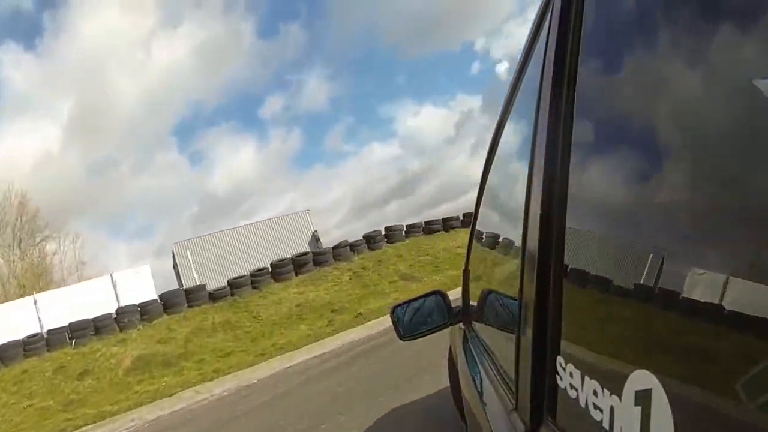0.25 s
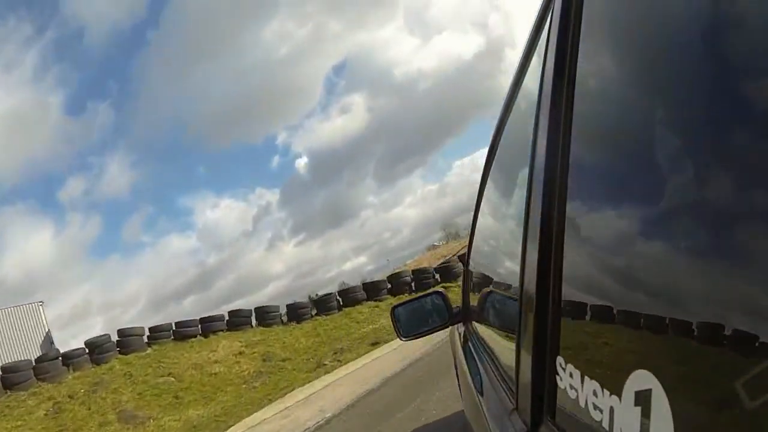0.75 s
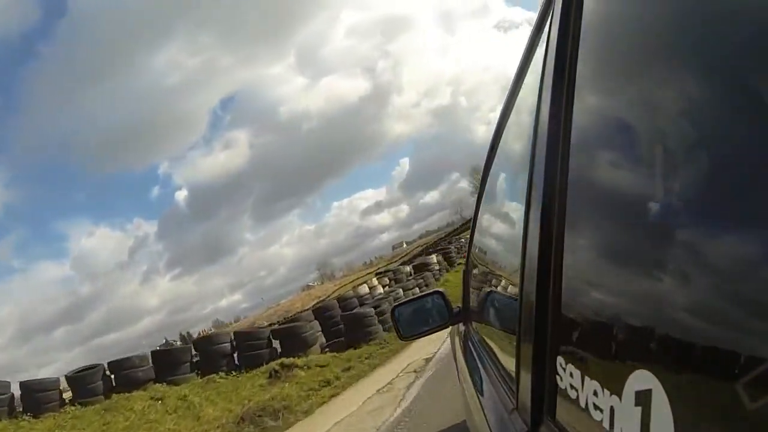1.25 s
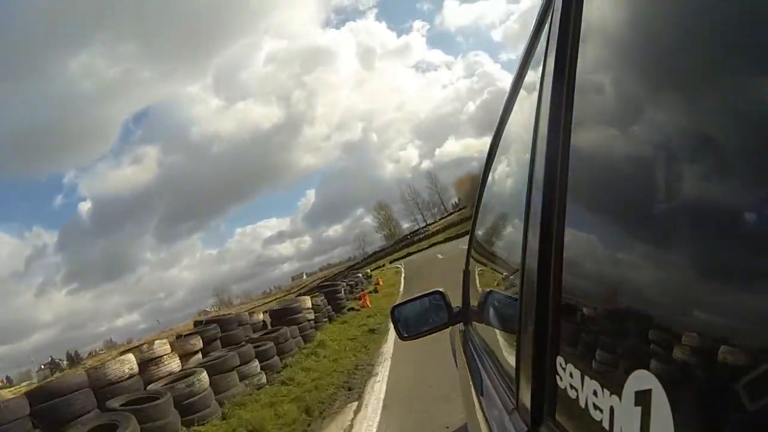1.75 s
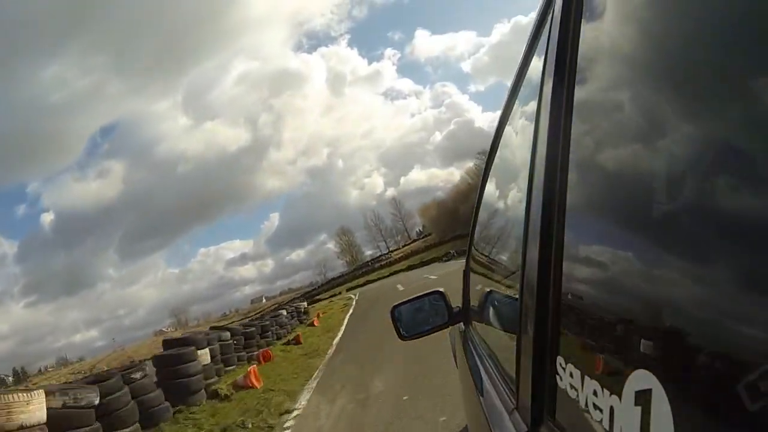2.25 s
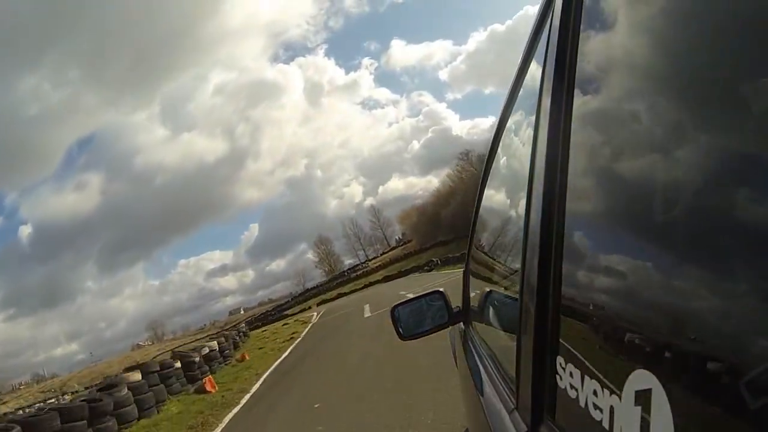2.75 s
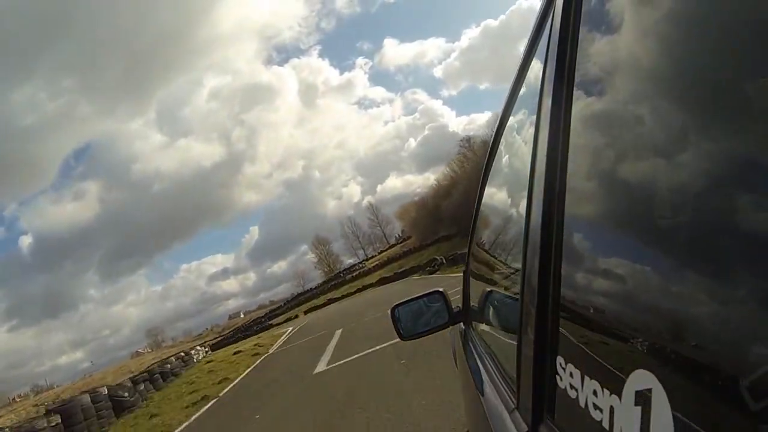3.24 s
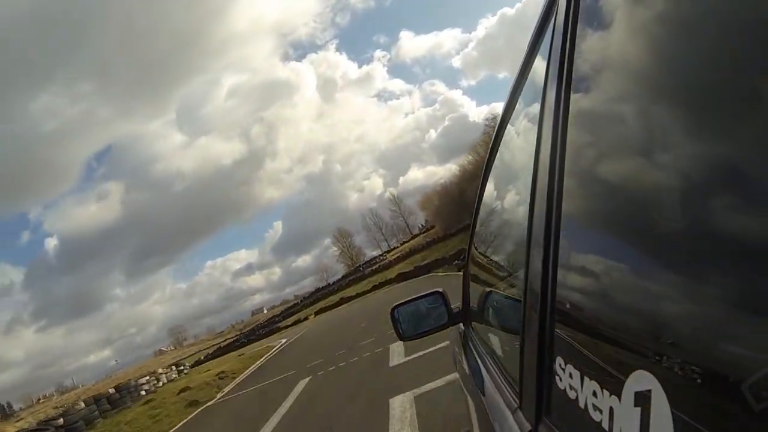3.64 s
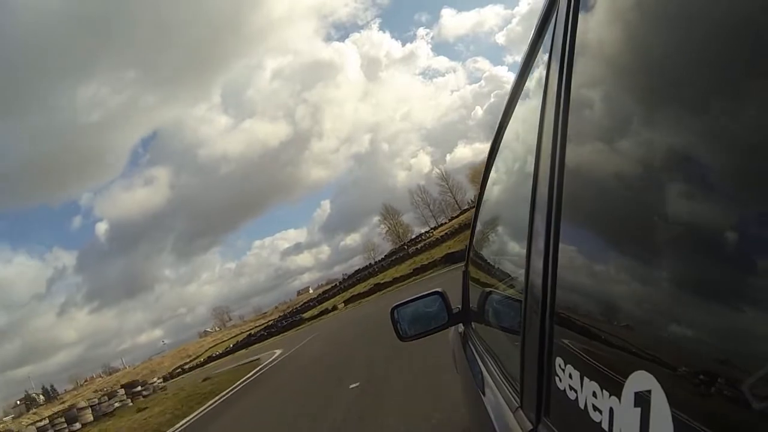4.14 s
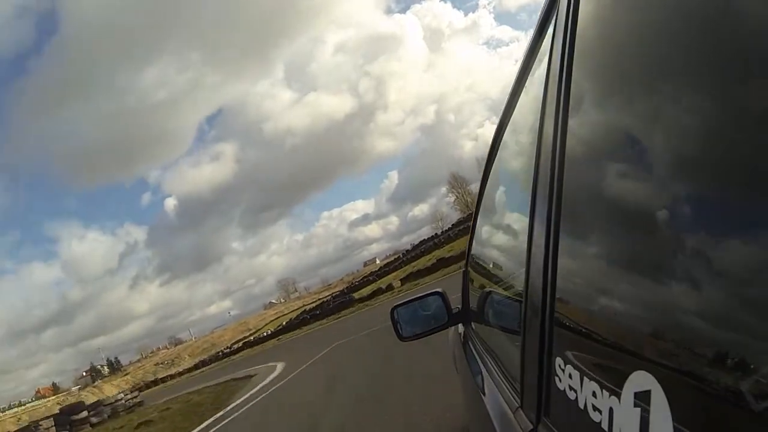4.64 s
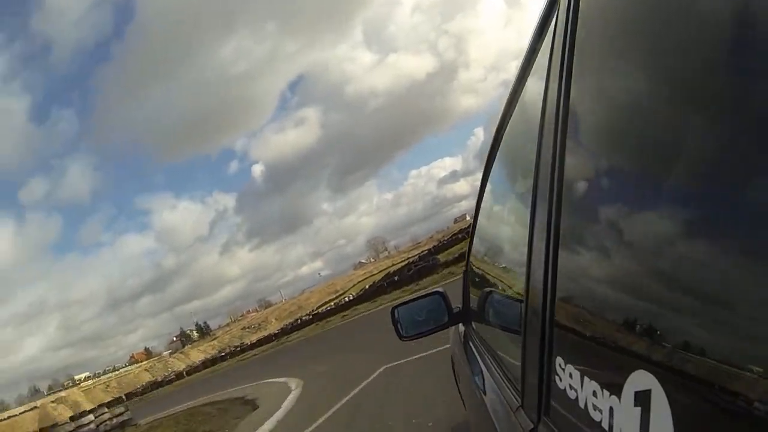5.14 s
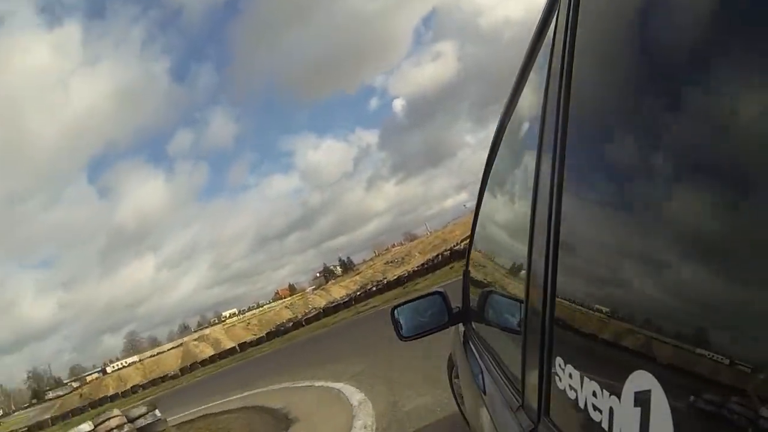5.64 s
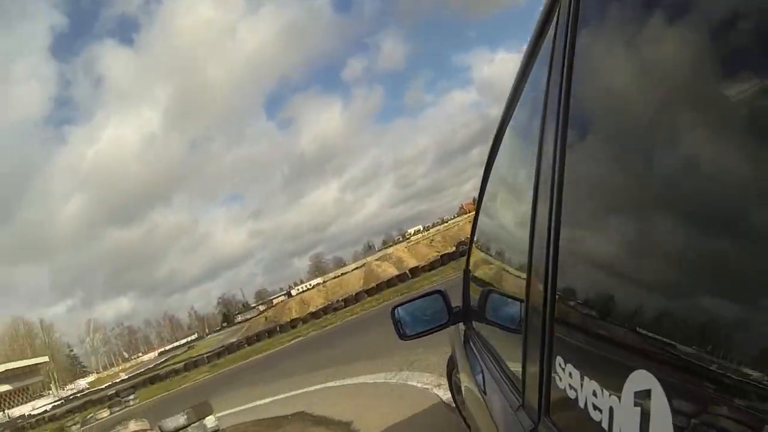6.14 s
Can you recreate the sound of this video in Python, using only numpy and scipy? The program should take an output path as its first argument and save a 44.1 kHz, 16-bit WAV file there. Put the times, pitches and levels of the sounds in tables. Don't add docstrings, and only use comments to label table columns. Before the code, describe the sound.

Outside a car on a tarmac track, a small enclosed microphone on the bodywork picks up a booming six-cylinder engine. Tyres squeal faintly leaving a bend, the engine climbs steadily with a gear whine and rushing hiss, then the driver lifts. A heavy bump and loud knock follow, and the lower engine note sinks while tyres scrub under braking.

```python
import sys
import numpy as np
from scipy import signal
from scipy.fft import rfft, irfft
from scipy.io import wavfile
from scipy.ndimage import uniform_filter1d

SR = 44100
rng = np.random.default_rng(int(sys.argv[2]) if len(sys.argv) > 2 else 0)


def volts(x):
    e = np.asarray(x, float) / 20
    return 10 ** e


def waveform_to_disk(signal):
    frames = np.transpose(np.atleast_2d(signal))
    scaled = np.clip(frames, -1, 1) * 32767
    samples = np.round(scaled).astype(np.int16)
    wavfile.write(sys.argv[1], SR, samples)


N = 281799
TIME = np.arange(N) / SR

# time_s, firing_hz
PULL_HZ = [(0, 74), (.6, 75.6), (.9, 78.4), (1.05, 81.2), (1.2, 85.8), (1.75, 97.6), (2.55, 113.9),
           (3.05, 124.7), (3.45, 132.6), (3.75, 137)]
# time_s, level_db
PULL_LOAD = [(0, -3), (.2, -2), (0.4, -6.5), (0.64, -1), (.8, -6.5), (1.2, 0), (2.45, 0), (2.55, -3.5),
             (2.95, -5.5), (3.4, -6.5), (3.6, -3.5), (3.75, -11)]
# time_s, firing_hz
SLOW_HZ = [(4.35, 108), (4.65, 104), (4.95, 95.3), (5.25, 91.4), (5.55, 84.8), (6, 77.5), (6.39, 73.5)]
# time_s, level_db
SLOW_LOAD = [(4.35, -30), (4.6, -13), (4.72, -20), (4.9, -9), (5.33, -5.5), (5.5, -0.5), (5.8, -10.5),
             (6.1, -10), (6.2, -16), (6.39, -5)]
# multiple, level_db
ORDERS = [(1, 0), (2, 0), (3, -3), (4, -12.5), (5, -7.5), (6, -8.5), (7.2, 1)]
# pitch_hz, width_hz, level_db
BODY = [(78.8, 7.6, -12.5), (80.9, 13.9, -6), (103.1, 23.6, -11), (127.2, 5.3, -15.5), (173.3, 20, -34),
        (191, 13, -31.5), (207, 28, -28.5), (232.9, 9.1, -34), (241.3, 6.8, -30), (275, 40, -40),
        (333, 17, -42), (347, 20, -36.5), (373, 17, -37.5), (464, 57, -35.5), (710, 97, -41),
        (895, 28, -36)]
# time_s, length_s, level_db
LIFTS = [
    (2.53, 0.022, -12.5),
    (2.972, 0.025, -5),
]
# time_s, level_db
MESH_SWELL = [(0, -8), (1.7, -6), (1.85, 0), (2.05, 3), (2.2, -1), (2.45, -1), (2.62, -6), (2.77, 8),
              (2.9, 3), (3.05, 6), (3.2, 8), (3.45, 6), (3.6, -6)]
# time_s, level_db
SECOND_MESH = [(1.9, -15), (2.15, -2), (2.3, 0), (2.45, 4), (2.6, 2.5), (2.78, 10), (2.95, -10), (3.1, -33)]
# time_s, level_db
WHEELSPIN = [(2.95, -40), (3.1, -7), (3.25, 4.5), (3.4, -3), (3.55, -16), (3.7, -35)]

# time_s, length_s, level_db
WOBBLES = [(.04, 0.12, -8), (.46, 0.13, -12.5), (1.65, 0.056, -9.5), (2.1, 0.047, -15.5),
           (2.37, 0.085, -15.5), (2.7, 0.1, -15), (3.08, 0.068, -13.5), (3.31, 0.16, -13),
           (3.5, 0.051, -18), (3.62, 0.2, -16), (3.83, 0.061, -6.5), (4, 0.062, -9), (4.16, 0.082, -14.5),
           (4.56, 0.071, -14), (4.84, 0.06, -11), (5.06, 0.11, -12.5), (5.3, 0.09, -7), (5.47, 0.12, -13.5),
           (5.67, 0.061, -8.5), (5.94, 0.065, -15.5), (6.19, 0.13, -8.5), (6.34, 0.077, -7)]
# time_s, length_s, level_db
BUFFETS = [(.05, 0.08, -31), (1.75, 0.12, -22.5), (2.3, 0.1, -25.5), (2.75, 0.39, -22.5),
           (3.28, 0.18, -21.5), (3.5, 0.022, -13.5), (3.62, 0.026, -27), (3.85, 0.19, -17),
           (4.03, 0.028, -15.5), (4.24, 0.075, -22), (4.97, 0.033, -29), (5.13, 0.057, -14),
           (5.41, 0.052, -18.5), (5.73, 0.019, -18), (5.96, 0.066, -12), (6.24, 0.05, -16.5)]
# pitch_hz, level_db (per Hz)
BUFFET_COLOUR = [(15, -2), (48, -1), (65, 5), (90, -6.5), (128, -14), (143, -17), (200, -28.5),
                 (300, -46.5), (900, -120)]
# time_s, length_s, level_db
BOOMS = [(0, 0.04, -16), (.17, 0.13, -24.5), (.33, 0.061, -15.5), (.45, 0.044, -22), (1.48, 0.12, -20.5),
         (1.65, 0.055, -24), (2, 0.21, -29), (2.5, 0.21, -29.5), (3.06, 0.26, -20.5), (3.35, 0.15, -20),
         (3.69, 0.099, -16), (3.88, 0.15, -19.5), (4.31, 0.035, -24.5), (4.5, 0.059, -23),
         (4.64, 0.08, -19.5), (4.86, 0.056, -18), (5.05, 0.12, -22.5), (5.3, 0.11, -18), (5.52, 0.094, -22),
         (5.8, 0.031, -20), (5.94, 0.1, -22.5), (6.06, 0.032, -26), (6.22, 0.17, -23)]
# time_s, pitch_hz
DOOR_HZ = [(0, 106), (3.7, 101.1), (4.4, 108.4), (6.39, 115.2)]

# time_s, level_db
AIRFLOW = [(0, -51.5), (.3, -53.5), (.52, -54.5), (.78, -59), (.95, -57.5), (1.53, -53.5), (1.6, -50.5),
           (2.05, -43.5), (2.46, -43), (2.54, -49), (2.8, -48), (2.95, -43), (3.2, -42), (3.42, -45),
           (3.56, -49.5), (3.8, -52), (3.83, -51.5), (4.6, -55), (5.2, -51.5), (5.8, -52), (6.39, -54.5)]
# time_s, length_s, level_db
GUSTS = [(.307, 0.011, -57), (.84, 0.06, -54), (.96, 0.073, -52.5), (1.1, 0.02, -54), (1.25, 0.21, -52),
         (1.58, 0.025, -50), (1.65, 0.069, -47.5), (2.03, 0.024, -50.5), (2.508, 0.025, -44),
         (2.564, 0.014, -44.5), (2.603, .014, -44), (2.674, 0.02, -46), (2.729, 0.01, -46),
         (2.79, 0.017, -48.5), (2.83, .015, -53), (3.11, 0.0093, -53.5), (3.29, 0.089, -38),
         (3.36, 0.012, -50), (3.825, 0.012, -48), (3.85, 0.03, -55), (3.9, 0.077, -47.5),
         (3.99, 0.034, -43), (4.4, 0.17, -52), (4.45, .05, -53.5), (5.29, 0.055, -50.5), (5.4, 0.087, -51),
         (5.8, 0.043, -57.5), (6, 0.32, -49.5)]
# pitch_hz, level_db (per Hz)
HISS_SLOPE = [(500, 0), (1000, 8.5), (1200, -3), (2000, 0.5), (2500, -5), (3300, -8), (4200, -15.5),
              (6000, -19), (8500, -30), (11000, -43), (13000, -55), (15000, -59)]
# pitch_hz, width_hz, level_db
CAVITIES = [(1408.5, 230, 17), (1600, 187, 12.5), (2865, 160, 9.5), (3610, 33, 7), (4936, 680, 12),
            (6540, 230, 4.5), (7570, 350, 8), (9870, 1600, 10)]
# time_s, level_db
GAP = [(0, 3), (3.5, 0.5), (3.56, -5), (3.8, -5), (3.82, -2), (4.1, 4.5), (4.5, 0.5), (4.6, -1.5),
       (5.15, -2), (5.3, 2), (5.5, -5.5), (5.7, -7), (5.73, 1.5), (6.1, 1.5), (6.25, -2.5), (6.39, -1.5)]
# time_s, level_db
ROAD = [(0, -40.5), (.6, -41), (1.2, -37), (2.2, -34), (3.3, -31.5), (3.75, -31), (4.5, -38), (5.3, -36),
        (5.8, -40), (6.39, -44)]
# time_s, length_s, level_db
PATCHES = [(0, 0.028, -28), (.1, .02, -47), (.26, 0.023, -41), (.307, 0.0081, -25), (.39, 0.043, -40),
           (.96, 0.14, -40), (1.52, 0.074, -37.5), (2.33, 0.034, -45), (2.48, 0.056, -33),
           (2.77, 0.033, -49), (2.94, 0.013, -31), (3, .03, -40), (3.11, 0.027, -42), (6.25, 0.039, -36.5)]
# pitch_hz, level_db (per Hz)
DRONE_COLOUR = [(90, -14), (150, 1), (210, -3.5), (280, -9.5), (400, -5.5), (550, -12), (800, -12.5),
                (1200, -16.5), (1700, -62.5), (4000, -110)]
# pitch_hz, width_hz, level_db
PANELS = [(337.3, 36, -11.5), (407.6, 6.4, -10.5), (512.3, 61, -13), (647, 30, -15), (729.5, 28, -16)]

# pitch_hz, level_db
WHINE = [(14745, -85.5), (14804, -93.5)]
# time_s, level_db
FAINT_HISS = [(0, -95.5), (.36, -93.5), (.4, -83), (1.4, -82.5), (1.5, -87), (2.2, -80.5), (3.4, -82),
              (3.7, -85.5), (4.9, -87.5), (5.3, -84), (5.7, -88), (6.39, -84)]

# time_s, length_s, pitch_hz, level_db
SLIP_LOW = [(.015, 0.019, 748, -36.5), (.05, 0.015, 722, -36), (.09, 0.015, 820, -39),
            (.13, .05, 800, -35.5), (.17, 0.012, 858, -40), (.2, 0.058, 840, -37.5), (.25, 0.015, 860, -32),
            (.325, 0.027, 852, -42), (.36, 0.0032, 835, -31), (.39, 0.02, 870, -43), (.44, 0.021, 825, -42),
            (.47, 0.036, 886, -37.5), (.52, 0.027, 846, -46)]
# time_s, length_s, pitch_hz, level_db
SLIP_HIGH = [(.03, 0.036, 1417, -35), (.085, 0.021, 1600, -33.5), (.13, 0.069, 1590, -32),
             (.19, 0.026, 1590, -33), (.26, 0.025, 1624, -34.5), (.312, 0.03, 1600, -34.5),
             (.37, 0.045, 1662, -37.5), (.445, 0.026, 1623, -39.5), (.51, 0.04, 1620, -49),
             (.58, .05, 1528, -41.5), (.64, 0.03, 1500, -48)]
# time_s, length_s, pitch_hz, level_db
SLIP_TOP = [(.07, 0.017, 2310, -45), (.12, 0.012, 2215, -45), (.2, 0.047, 2287, -47),
            (.275, 0.013, 2516, -51), (.4, 0.11, 2400, -52)]
# time_s, length_s, pitch_hz, level_db
SCRUB = [(4.68, 0.022, 1620, -42), (4.76, 0.037, 1600, -50), (4.84, 0.081, 1640, -45.5),
         (4.92, 0.053, 1622, -39), (5.04, 0.024, 1590, -38), (5.11, 0.0092, 1562, -33.5),
         (5.19, 0.035, 1614, -42.5), (5.28, 0.069, 1534, -41.5), (5.36, 0.026, 1600, -51),
         (5.43, 0.019, 1684, -40), (5.58, 0.029, 1615, -35), (5.66, 0.035, 1600, -36),
         (5.82, .04, 1644, -44), (5.9, 0.019, 1620, -44), (5.98, 0.029, 1614, -38.5),
         (6.02, 0.012, 1522, -30.5), (6.07, 0.038, 1566, -35.5), (6.13, 0.022, 1550, -44),
         (6.22, 0.032, 1647, -38), (6.29, 0.02, 1584, -38), (6.33, 0.014, 1590, -46)]
# time_s, length_s, pitch_hz, level_db
CHIRPS = [(3.515, .008, 1567, -35), (3.533, 0.011, 1556, -30), (4.675, 0.0078, 1300, -39),
          (5.02, 0.0069, 1945, -49.5), (5.04, 0.0099, 2063, -48), (6.17, 0.022, 1450, -38)]
# time_s, length_s, pitch_hz, level_db
HUM_LOW = [(4.43, .04, 416, -43), (4.5, .05, 405, -43), (4.65, 0.036, 522, -45), (4.75, .03, 518, -44),
           (4.94, .04, 515, -37), (5.1, 0.04, 517, -45), (5.35, .04, 522, -46)]
# time_s, length_s, pitch_hz, level_db
HUM_HIGH = [(4.59, .03, 678, -44), (4.64, .03, 643, -48), (4.72, .03, 637, -40.5), (4.97, .03, 625, -46),
            (5.04, .025, 632, -37), (5.12, .015, 700, -43), (5.34, 0.018, 724, -45)]

# start_s, peak_db, swing_hz, first_swing (1 up, -1 down)
BUMPS = [
    (0.3, -5, 73, 1),
    (2.585, -5, 87.5, 1),
    (3.291, -5.5, 58, -1),
    (3.8, -28, 40, 1),
    (3.9913, -1.5, 45.6, 1),
    (4.833, -5, 56.6, -1),
]
# start_s, peak_db, extra_db (modes below 1.4 kHz)
KNOCKS = [
    (0.3008, -12, 5),
    (2.5565, -14, -3),
    (2.602, -28, 0),
    (2.66, -18, -3),
    (2.728, -24, 0),
    (3.515, -27, -6),
    (3.9992, -9.5, -4),
    (5.107, -32, -6),
    (6.013, -28, -6),
]
# pitch_hz, level_db, t60_s
KNOCK_MODES = [(420, -9, 0.018), (700, -1.5, 0.016), (980, -2, 0.013), (1300, -9, 0.013), (1590, 12, 0.021),
               (2250, -3, 0.019), (2800, -14.5, .012), (3600, -15, 0.01)]
# start_s, peak_db
GRIT = [(0.67, -50), (3.8143, -43), (3.8245, -38), (4.149, -49), (4.7943, -53), (4.8348, -49.5),
        (5.2683, -49), (5.3024, -49), (6.2792, -48), (6.2925, -63), (6.3098, -51), (6.326, -63),
        (6.347, -42), (6.3615, -51)]


def evened(x):
    return x / np.sqrt(np.mean(x ** 2) + 1e-20)


def read(points, hz):
    f, value = np.transpose(points)
    return np.interp(np.log(hz + 1), np.log(f + 1), value)


def curves(rows, t=TIME):
    s, *columns = np.transpose(rows)
    since_start = t - s[0] + 0.05 * (s[0] < 0.01)
    until_end = s[-1] - t + 0.05
    on = np.clip(np.minimum(since_start, until_end) / 0.05, 0, 1)
    return [np.interp(t, s, c) for c in columns], on


def level_db(rows):
    return curves(rows)[0][0]


def surges(rows, rest_db):
    t = TIME[::32]
    swell = sum(volts(2 * db) * np.exp(-((t - s) / length) ** 2 * 2) for s, length, db in rows)
    return 10 * np.log10(volts(2 * rest_db) + np.interp(TIME, t, swell))


def wander(top_hz):
    low_pass = signal.butter(2, top_hz, fs=SR / 64)
    coarse = signal.lfilter(*low_pass, rng.standard_normal(N // 64 + 300))[298:]
    return np.interp(TIME, np.arange(len(coarse)) * 64 / SR, evened(coarse))


def resonate(x, hz, width_hz):
    turn = np.exp(2j * np.pi * np.cumsum(hz * np.ones(len(x))) / SR)
    r = np.exp(-np.pi * width_hz / SR)
    return 2 * (turn * signal.lfilter([(1 - r) ** 2], [1, -2 * r, r * r], x / turn)).real


def steadied(x, seconds, share):
    power = uniform_filter1d(x ** 2, int(seconds * SR))
    return evened(x / (abs(power) + 0.0075 * power.mean()) ** (share / 2))


def noise(db_of, frame, patchy_db, flicker_db):
    hop = frame // 4
    frames, hz = N // hop + 5, np.fft.rfftfreq(frame, 1 / SR)
    a, b, patches = rng.standard_normal((frames, len(hz), 3)).T
    patches = uniform_filter1d(patches, size=5, axis=0)
    patches = evened(uniform_filter1d(patches, size=12, axis=1))
    flicker = evened(uniform_filter1d(rng.standard_normal(frames), size=3))
    db = db_of(hz[:, None], np.arange(frames) * hop / SR)
    db = db + patchy_db * patches + flicker_db * flicker
    return signal.istft((a + 1j * b) * volts(db), nperseg=frame, noverlap=frame - hop)[1][:N]


def through_body(hz):
    return np.sqrt(sum(volts(2 * db) / (1 + (2 * (hz - f) / w) ** 2) ** 2 for f, w, db in BODY))


def engine(speed, load, orders, jitter, rough_db, top_db=0):
    (hz,), on = curves(speed)
    turns = np.cumsum(hz * (1 + jitter * wander(7.3))) / SR
    tones = []
    for k, db in orders:
        path = np.repeat(through_body(k * hz[::64]), 64)[:N]
        rough = volts(db + rough_db * np.sqrt(k) * wander(12))
        tones.append(path * rough * np.sin(2 * np.pi * (k * turns + rng.random())))
    tones[-1] = tones[-1] * volts(top_db)
    slack_db = sum(db * np.exp(-((TIME - s) / length) ** 2) for s, length, db in LIFTS)
    return np.sqrt(2) * on * volts(level_db(load) + slack_db) * sum(tones)


def drivetrain():
    motor = engine(PULL_HZ, PULL_LOAD, ORDERS, 0.0015, 0.5, level_db(MESH_SWELL))
    motor += engine(SLOW_HZ, SLOW_LOAD, [(1, 0), (2, -5)], 0.003, 0.8)
    motor += engine(PULL_HZ, SECOND_MESH, [(6.64, 0)], 0.002, 0.6)
    motor += engine(PULL_HZ, WHEELSPIN, [(3, 0)], 0.003, 1)
    return motor


def shake():
    mount = steadied(resonate(rng.standard_normal(N), 29.5, 6.7), 0.16, 0.66)
    mount *= volts(surges(WOBBLES, -23) - 0.5)

    wind = noise(lambda hz, t: read(BUFFET_COLOUR, hz) + 0 * t, 4096, 0.6, 4)
    wind = steadied(wind, 0.05, 0.75) * volts(surges(BUFFETS, -25.5) - 0.5)

    door = rng.standard_normal(N)
    for _ in range(3):
        door = resonate(door, level_db(DOOR_HZ), 61)
    still_db = -10 * np.exp(-((TIME - 4.17) / 0.07) ** 2)
    door = steadied(door, 0.046, 0.48) * volts(surges(BOOMS, -29.5) + still_db)

    dip_db, dip_s = -8.5, 0.012
    dips_db = sum(dip_db * np.exp(-((TIME - s - 0.5 / hz) / dip_s) ** 2)
                 for s, db, hz, way in BUMPS if db > -12)
    return volts(dips_db) * (mount + wind + door)


def housing_db(hz):
    return read(HISS_SLOPE, hz) + sum(db / (1 + (2 * (hz - f) / w) ** 2) for f, w, db in CAVITIES)


def air_hiss():
    flow_db = level_db(AIRFLOW)
    hiss_db = surges(GUSTS, flow_db)
    bright_db = -1.5 + 0.1249 * (flow_db + 47) + 0.21 * (hiss_db - flow_db)

    def colour(hz, t):
        now_db = np.interp(t, TIME, hiss_db)
        gap_db = curves(GAP, t)[0][0] * np.where(hz < 4300, 1, 0.3) * (hz > 3200)
        brake_db = -4.5 * np.clip((t - 4.55) / 0.24, 0, 1) / (1 + ((hz - 1420) / 130) ** 2)
        brake_db = brake_db - 4.5 * np.clip((t - 5.6) / 0.2, 0, 1) / (1 + ((hz - 4960) / 300) ** 2)
        treble_db = np.interp(t, TIME, bright_db) * np.clip(np.log2(hz / 3200 + 1e-9) * 12, 0, 1.6)
        top_db = 0.82 * (now_db + 50) * (hz > 10500)
        coast_db = -1.15 * np.maximum(t - 2.6, 0) * (hz > 4300)
        edge_db = (-1.5 + 0.45 * np.minimum(now_db + 53, 2)) * (hz > 3200) * (hz < 4300)
        return housing_db(hz) + gap_db + brake_db + treble_db + top_db + coast_db + edge_db

    return volts(hiss_db + 13) * evened(noise(colour, 256, 1.3, 0.93))


def road_drone():
    panels = sum(volts(db) * evened(resonate(rng.standard_normal(N), f, w)) for f, w, db in PANELS)
    rolling = evened(noise(lambda hz, t: read(DRONE_COLOUR, hz) + 0 * t, 1024, 0.95, 0.5))
    unloaded_db = -8 * np.exp(-((TIME - 4.146) / 0.18) ** 2)
    return volts(surges(PATCHES, level_db(ROAD)) + unloaded_db) * evened(rolling + panels)


def high_whine():
    whine = np.zeros(N)
    for hz, db in WHINE:
        tone_db = db + 3.5 * wander(6) - 6 * (TIME < 1.6)
        whine += np.sqrt(2) * volts(tone_db) * np.sin(2 * np.pi * hz * TIME)
    return whine


def faint_hiss():
    return volts(level_db(FAINT_HISS) + 5 * wander(12)) * rng.standard_normal(N)


def squeal(rows, width, chop_db):
    s, length, pitch, db = np.transpose(rows)
    hz = np.interp(TIME, s, pitch) * (1 + 0.006 * wander(20))
    whistle = steadied(resonate(rng.standard_normal(N), hz, width * pitch.mean()), 0.01, 0.96)
    return volts(surges(zip(s, length, db), -90) + chop_db * wander(36)) * whistle


def tyres_and_floor():
    slips = squeal(SLIP_LOW, 0.045, 1.2) + squeal(SLIP_HIGH, 0.07, 1.5)
    slips += volts(-2) * squeal(SLIP_TOP, 0.12, 2)
    braking = squeal(SCRUB, 0.03, 2) + squeal(CHIRPS, 0.015, 1)
    floor_hum = squeal(HUM_LOW, 0.03, 1) + squeal(HUM_HIGH, 0.03, 1)
    return slips + braking + floor_hum


def bumps():
    t, out = np.arange(4096) / SR, np.zeros(N + 4096)
    onset = np.sin(np.pi / 2 * np.minimum(t / 0.007, 1)) ** 2
    for s, db, hz, way in BUMPS:
        swing = np.sin(2 * np.pi * hz * t) * np.exp(-(t * hz / 1.15) ** 4)
        out[round(s * SR):][:4096] += np.sign(way) * volts(db) * swing * onset
    return out[:N]


def knocks():
    t, out = np.arange(2048) / SR, np.zeros(N + 2048)
    detunes = rng.uniform(0.93, 1.04, (len(KNOCKS), len(KNOCK_MODES)))
    for (s, db, low_db), detune in zip(KNOCKS, detunes):
        ring = np.zeros(2048)
        for (hz, mode_db, t60), d in zip(KNOCK_MODES, detune):
            decay = volts(mode_db + low_db * (hz < 1400) - 60 * t / t60)
            ring += decay * np.sin(2 * np.pi * hz * d * t)
        out[round(s * SR):][:2048] += volts(db + 0.5) * ring / abs(ring).max() * np.minimum(t / 0.0007, 1)
    return out[:N]


def grit():
    t, out = np.arange(2048) / SR, np.zeros(N + 2048)
    shape = volts(-16 * np.log2(np.fft.rfftfreq(2048, 1 / SR) / 5200 + 1e-3) ** 2)
    envelope = volts(-60 * t / 0.018) * np.minimum(t / 0.0004, 1)
    for s, db in GRIT:
        burst = irfft(rfft(rng.standard_normal(2048)) * shape) * envelope
        out[round(s * SR):][:2048] += volts(db + 0.5) * burst / abs(burst).max()
    return out[:N]


def scene():
    steady = drivetrain() + shake() + air_hiss() + road_drone()
    faint_layers = high_whine() + faint_hiss()
    events = tyres_and_floor() + bumps() + knocks() + grit()
    return (steady + faint_layers + events)[None]


def top_cut(x):
    return signal.sosfilt(signal.butter(12, 15720, fs=SR, output="sos"), x)


def record(dry):
    rounded = dry / (1 + (dry / 0.96) ** 6) ** (1 / 6)
    mix = rounded * np.clip(0.5 + np.minimum(TIME, TIME[::-1]) / 0.028, 0, 1)
    return top_cut(mix)


dry = scene()
out = record(dry)
waveform_to_disk(out)
```